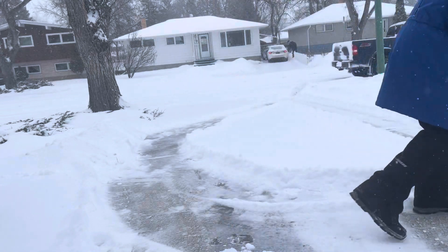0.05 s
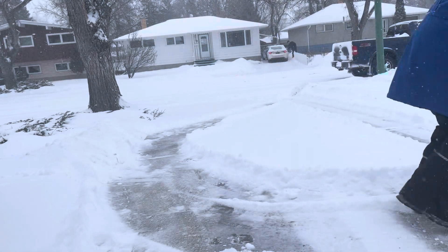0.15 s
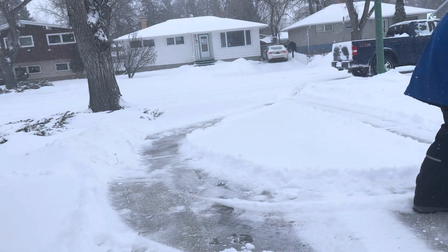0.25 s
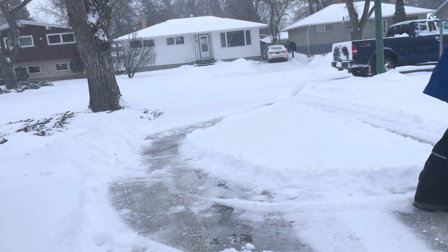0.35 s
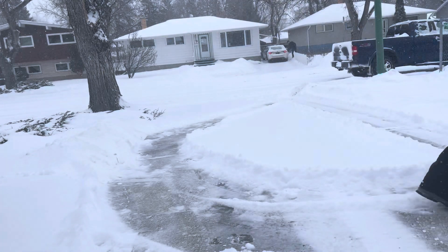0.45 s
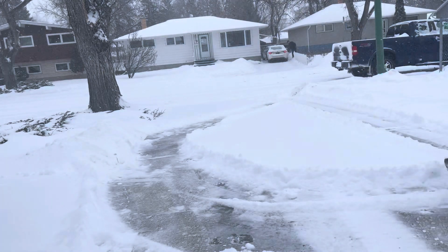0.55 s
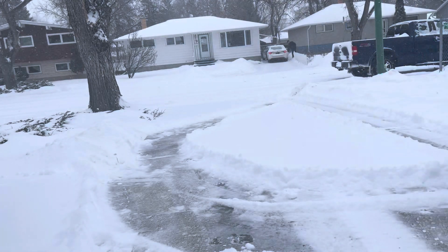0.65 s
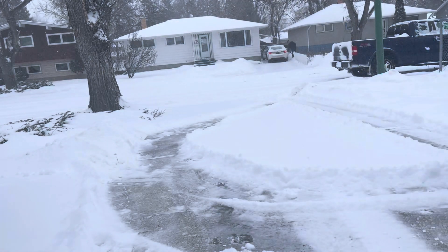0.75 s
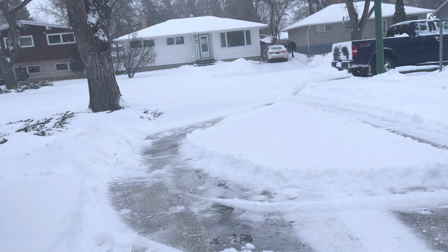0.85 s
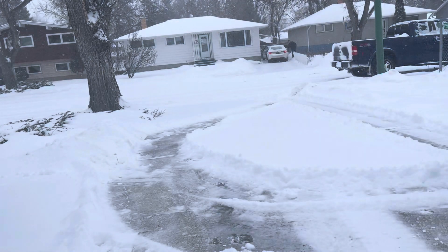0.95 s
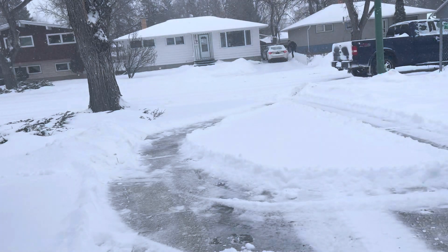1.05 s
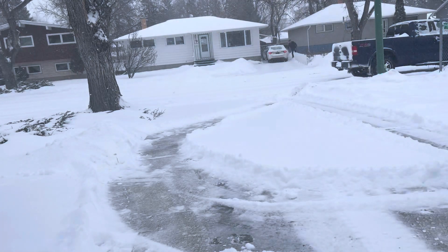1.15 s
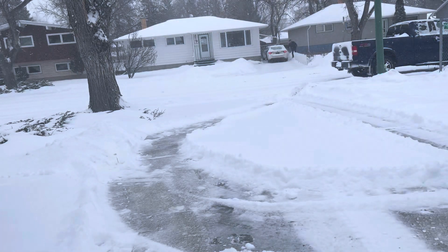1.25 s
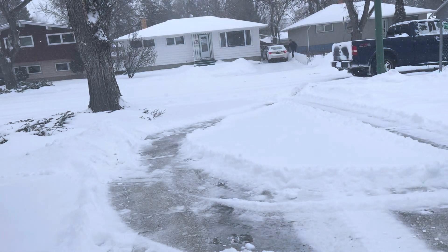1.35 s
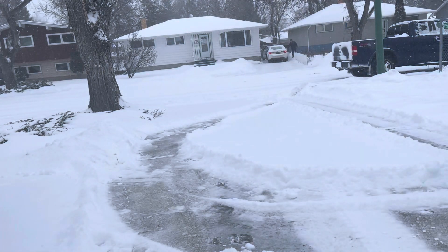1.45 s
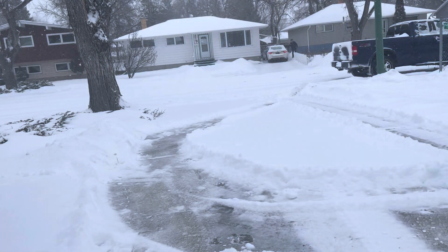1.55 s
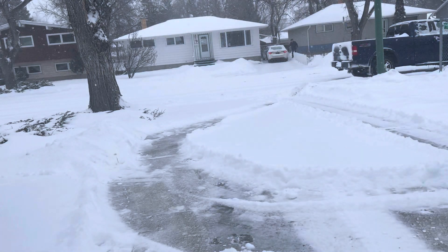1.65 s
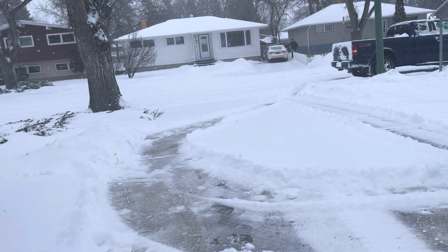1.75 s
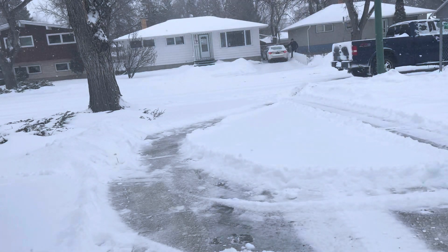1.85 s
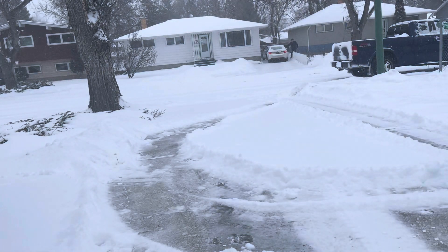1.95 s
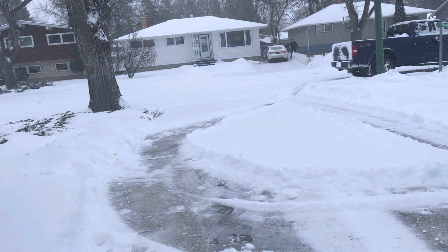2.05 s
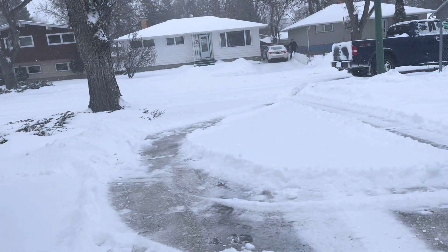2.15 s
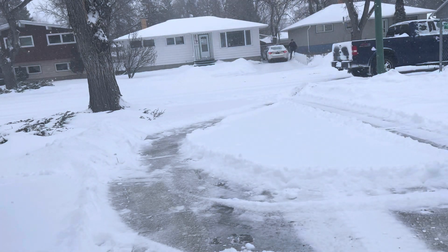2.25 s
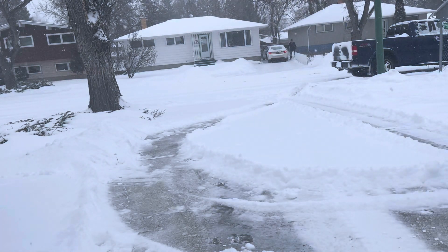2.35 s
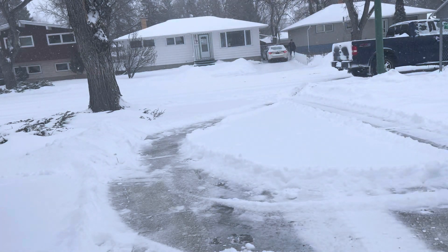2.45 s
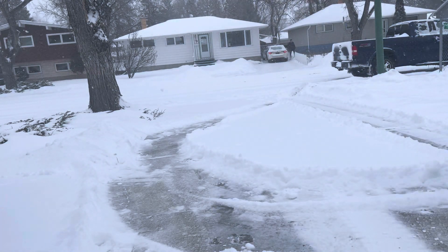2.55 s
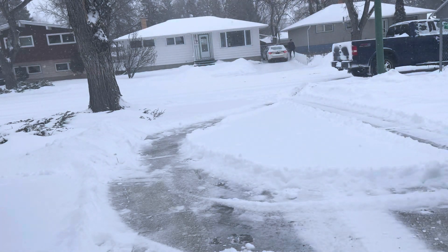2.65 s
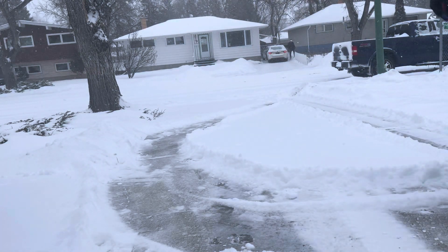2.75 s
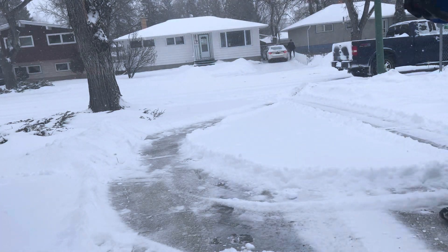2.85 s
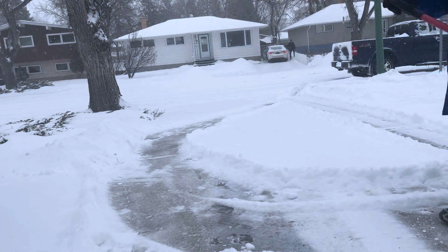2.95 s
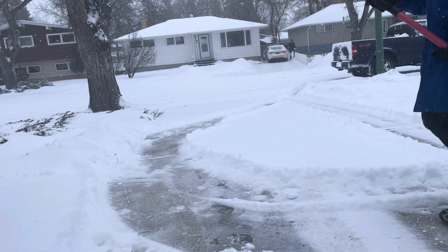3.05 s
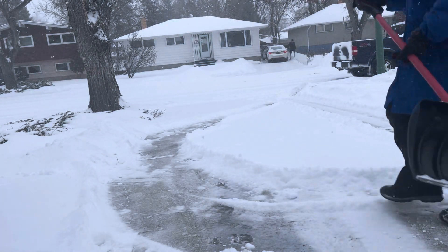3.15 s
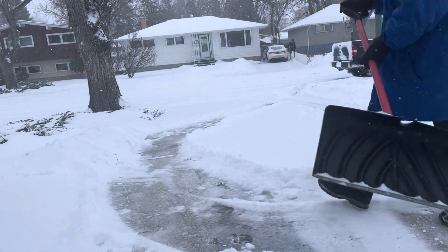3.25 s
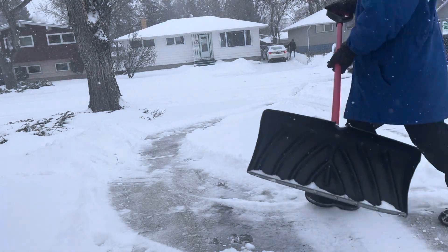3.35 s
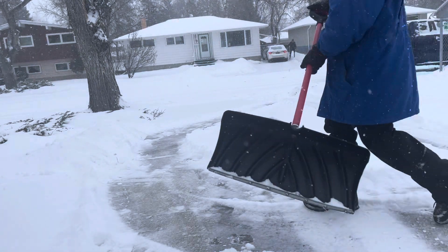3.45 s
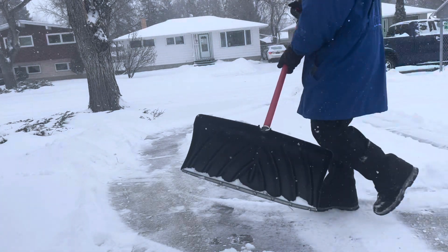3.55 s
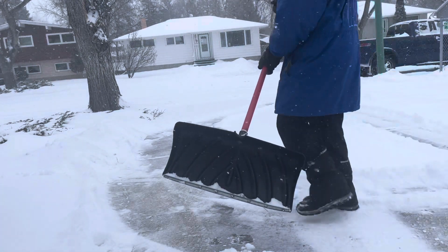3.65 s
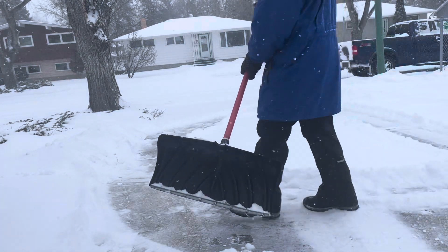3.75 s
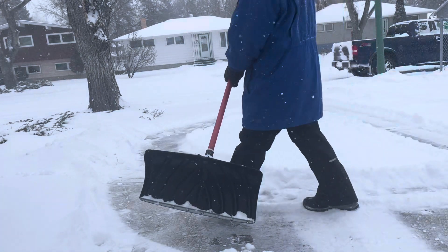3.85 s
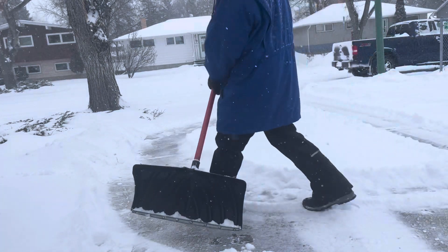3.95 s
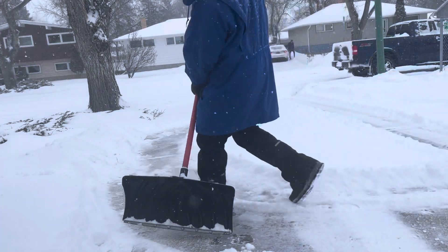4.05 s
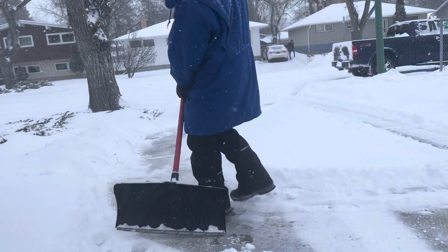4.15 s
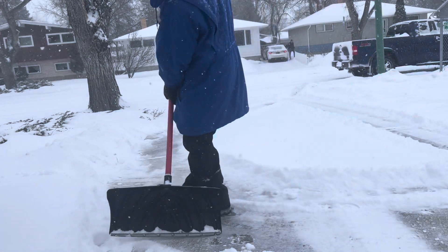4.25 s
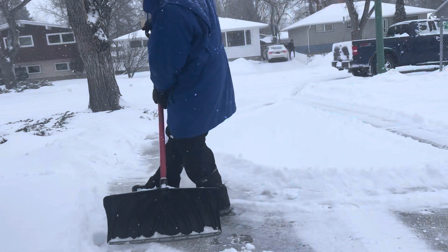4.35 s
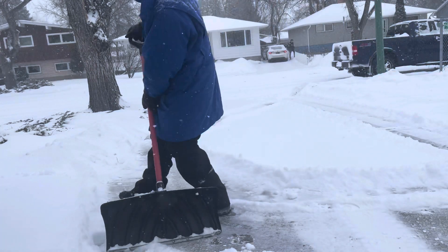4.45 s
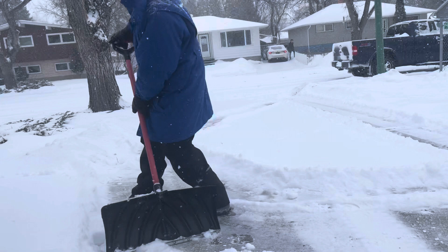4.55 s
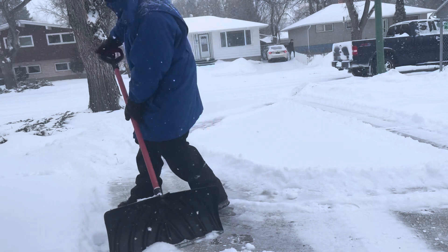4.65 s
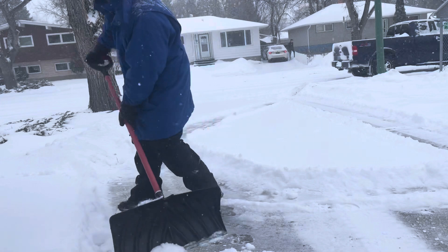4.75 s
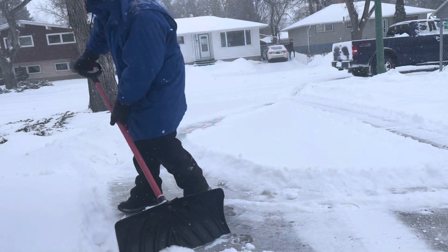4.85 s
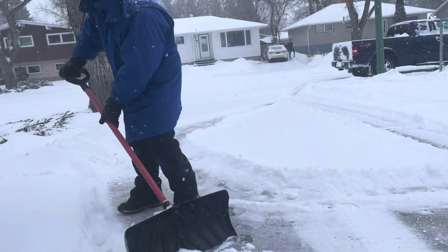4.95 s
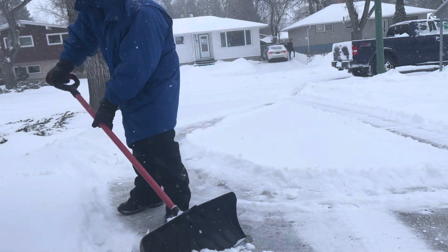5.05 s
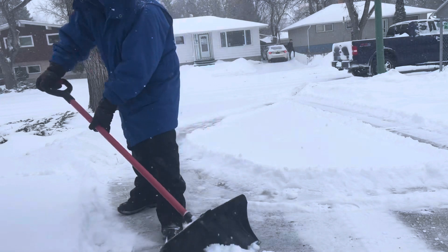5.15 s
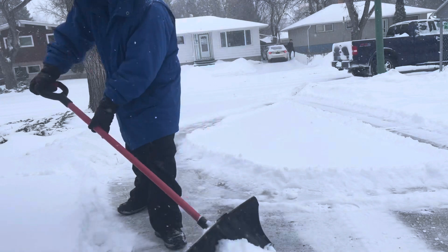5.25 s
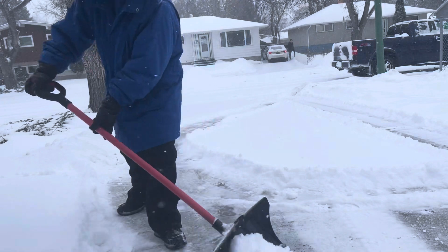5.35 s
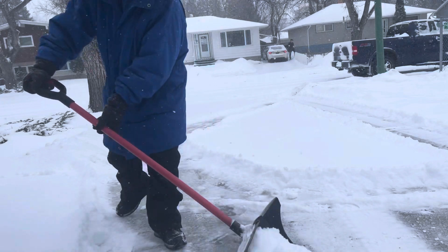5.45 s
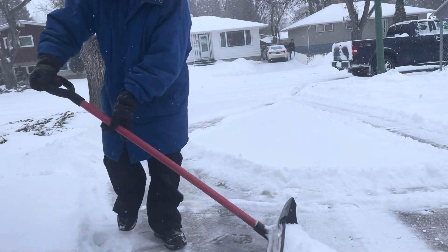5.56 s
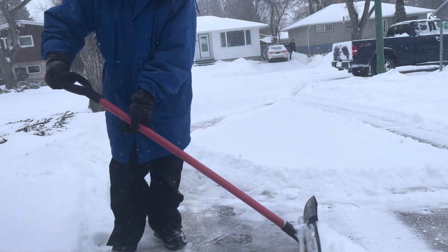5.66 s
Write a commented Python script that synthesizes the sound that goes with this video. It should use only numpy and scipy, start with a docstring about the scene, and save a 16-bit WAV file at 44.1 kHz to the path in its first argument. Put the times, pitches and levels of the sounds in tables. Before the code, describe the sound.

An engine idles in the street throughout, with a quiet low rumble and fast, steady ticking over a soft rush of distant traffic. For the first half second, a plastic snow shovel glides over snowy pavement a little way off, catching with a few small bumps. From about 0.6 to 4.1 seconds, boots crunch and creak faintly in snow and nylon clothes swish; the swishes are clearest around 2.5 to 2.9 seconds, the creaks around 3.8 to 4. At about 4.4 seconds the blade is set down close to the microphone, bouncing with several hollow knocks. From 4.7 seconds comes a loud, close push: the empty blade booms and judders, then the boom eases as snow fills it, while the edge grinds over grit with sharp snaps, brief ringing skids and a snowy hiss. The scrape dips around 5.4 seconds and swells again until the end, near 5.7.

```python
"""A wide plastic snow shovel ends one push over snowy pavement, is carried back, set down close by and
pushed again. Its edge grinds, sticks and catches on grit, and the hollow blade booms until snow fills it.
Between the pushes, boots press the snow and nylon clothes swish. All along, an engine idles in the
street with a low rumble and a steady tick, over the soft rush of distant traffic."""
import sys
import numpy as np
from scipy.fft import rfft, irfft, next_fast_len
from scipy.io import wavfile
from scipy.ndimage import map_coordinates

SR = 44100
rng = np.random.default_rng(int(sys.argv[2]) if len(sys.argv) > 2 else 0)


def pcm_store(signal):
    """Save signal as 16-bit PCM."""
    levels = np.round(np.clip(np.atleast_2d(signal), -1, 1) * 32767)
    wavfile.write(sys.argv[1], SR, levels.astype(np.int16).T)


N = 252252
TIME = np.arange(N) / SR
DIRECT_ONLY = np.array([[1], [0]])  # sounds have two rows: direct and scattered

# the edge catches hard on the ground: t/s, crushed grit/dB, thump/dB, thump pitch/Hz
CATCHES = [(0.319, -40.5, -24, 660), (0.322, -38, -27, 223), (0.329, -29.5, -21.5, 612),
           (0.331, -40, -14.5, 147), (0.346, -35, -38, 615), (0.358, -36, -29, 608),
           (0.406, -43.5, -31.5, 560), (0.446, -47, -27.5, 615), (0.484, -43, -27, 572),
           (0.493, -38, -26.5, 170), (4.651, -26, -17, 353), (4.662, -25, -14, 395),
           (4.677, -17, -11.5, 272), (4.690, -17, -13, 295), (4.703, -31, -5.5, 415),
           (4.714, -20, -12, 220), (4.759, -24.5, -15, 260), (4.773, -21, -6.5, 248),
           (4.789, -16.5, -11, 258), (4.817, -19.5, -7.5, 270), (4.831, -15.5, -7.5, 428),
           (4.839, -41, -13, 233), (4.864, -21, -7.5, 298), (4.883, -20.5, -10.5, 387),
           (4.906, -37, -10.5, 231), (4.923, -21.5, -9, 292), (4.939, -30, -10.5, 267),
           (4.961, -21.5, -21, 310), (5.027, -19.5, -16, 292), (5.049, -26, -11.5, 520),
           (5.065, -17.5, -12.5, 262), (5.109, -19, -16, 280), (5.142, -23.5, -28, 540),
           (5.165, -18.5, -11.5, 283), (5.249, -21, -12.5, 323), (5.273, -23, -23, 317),
           (5.347, -23.5, -14, 326), (5.402, -27, -36, 275), (5.413, -28.5, -24, 300),
           (5.537, -39, -16.5, 322), (5.605, -29, -14, 345), (5.619, -27, -15.5, 368),
           (5.669, -23, -16, 329.8), (5.675, -26.5, -7.5, 306), (5.703, -29, -14, 370)]
# low and high resonances (pitches it rings at) of the pressed blade: f/Hz, width/Hz, level/dB
BOOM_MODES = [(138, 133, -10.5), (284.4, 47, -0.5), (338, 67, -5), (460, 66, -6), (564, 27, -11)]
GRIND_MODES = [(557, 53, 9), (757, 48, 10.5), (933, 165, 3.5), (1352, 165, 5), (1570, 200, 1.5),
               (2046, 30, -6), (2098, 60, -1.5), (2360, 270, -4), (2740, 58, -1), (2925, 120, -4.5),
               (3040, 420, -14), (3110, 59, 2.5), (3197, 63, -2), (3490, 230, -10), (4130, 410, -8),
               (4400, 320, -24)]
# tone colours of sliding snow, crushed snow and scraped stone: f/Hz, level/dB
SNOW_HISS = [(1500, -44), (3500, -16.5), (5000, -11), (6700, -9.5), (7800, -3.5), (9300, 1), (10200, 1),
             (11800, -12.5), (12800, -26), (13800, -48), (16000, -50)]
SNOW_CRUNCH = [(100, -25), (250, 18), (450, 3), (800, 14), (1400, 11), (2400, 13.5), (4000, 1), (7000, -7),
               (9000, 12), (13000, -50)]
STONE_RASP = [(250, -75), (500, 6.5), (900, -4.5), (1400, -1), (2400, -1.5), (3200, -3), (4500, -11),
              (6000, -12.5), (9000, -26), (13000, -70)]


def amp(db):
    """Turn decibels into a gain."""
    return 10 ** (np.asarray(db) / 20)


def rms(x):
    """The average strength of a signal (root mean square)."""
    return np.sqrt(np.mean(x ** 2) + 1e-20)


def unit(x):
    """Scale a signal to an average strength of 1."""
    return x / rms(x)


def along(points, hz):
    """Read between (frequency, value) points on a logarithmic frequency axis."""
    f, values = np.transpose(points)
    return np.interp(np.log(hz + 1), np.log(f + 1), values)


def curves(rows):
    """Turn each column after the time into one value per sample."""
    times, *columns = np.transpose(rows)
    return [np.interp(TIME, times, column) for column in columns]


def wobble(rate, size=N):
    """A smooth curve through `rate` random values a second."""
    count = int(size * rate / SR) + 4
    fine = np.arange(0, count, 1 / 8)
    smooth = map_coordinates(rng.standard_normal(count), [fine])
    return np.interp(np.arange(size) * rate / SR, fine, smooth)


def filtered(x, response):
    """Multiply each frequency f in x by response(f)."""
    size = x.shape[-1]
    padded = next_fast_len(size + 4096)
    return irfft(rfft(x, padded) * response(np.fft.rfftfreq(padded, 1 / SR)), padded)[..., :size]


def lowpass(x, hz, steepness):
    """Turn down everything above hz."""
    return filtered(x, lambda f: 1 / (1 + (f / hz) ** steepness))


def bandpass(x, low_hz, high_hz):
    """Turn down everything below low_hz and above high_hz."""
    return filtered(x, lambda f: (1 - 1 / (1 + (f / low_hz) ** 4)) / (1 + (f / high_hz) ** 4))


def coloured(x, spectrum):
    """Give x a tone colour, at strength 1."""
    return unit(filtered(x, lambda f: amp(along(spectrum, f))))


def rung(x, modes):
    """Let x ring a set of resonances (f/Hz, width/Hz, level/dB), at strength 1."""
    def response(f):
        return sum((-1) ** k * amp(db) * 1j * f * width / (hz * hz - f * f + 1j * f * width)
                   for k, (hz, width, db) in enumerate(modes))
    return unit(filtered(x, response))


def grit(rate, spread_db, size=N):
    """Two rows of tiny cracks of uneven strength, about `rate` a second in each."""
    hit = rng.random((2, size)) < rate / SR
    sign, chance = rng.random((2, 2, size))
    strength = amp(spread_db * np.minimum(-np.log(1 - chance[hit]), 3))
    out = np.zeros((2, size))
    out[hit] = strength * np.sign(sign[hit] - .5)
    return unit(out)


def add(track, s, sound):
    """Mix a sound into a track, starting at s seconds."""
    part = track[:, max(round(s * SR), 0):][:, :sound.shape[-1]]
    part += sound[..., :part.shape[-1]]


def arch(length_s):
    """Progress from 0 to 1 through a movement, and a swell that rises and falls with it."""
    progress = np.linspace(0, 1, int(length_s * SR))
    return progress, np.sin(np.pi * progress)


def effort(drive, boom_db, grind_db, hiss_db, empty_db, attack_s=.03, release_s=.11, fill_s=0.25):
    """Boom, grind and hiss levels in dB follow the drive; the boom changes as snow fills the blade."""
    drive_db, = curves(drive)
    mean_db = np.mean(drive, axis=0)[1]
    swing_db = drive_db - mean_db
    since_start, since_end = TIME - drive[0][0], TIME - drive[-1][0]
    fade_db = 60 * (np.minimum(since_start, 0) / attack_s - np.maximum(since_end, 0) / release_s)
    hollow_db = empty_db * np.exp(-np.maximum(since_start, 0) / fill_s)
    levels = [boom_db + 0.43 * swing_db + hollow_db, grind_db + swing_db, hiss_db + 1.42 * swing_db]
    return mean_db + fade_db + np.array(levels)


def bent(x, s):
    """Bending and a load of snow shift the blade's pitch: play x faster or slower, 4/5 as long."""
    bend = [(4.649, 1.01), (4.751, 0.89), (5.05, 0.97), (5.3, 1.02), (5.7, 0.99)]  # the blade's pitch: t/s, ratio to the unbent pitch
    size = len(x) * 4 // 5
    speed = np.interp(s + np.arange(size) / SR, *np.transpose(bend))
    return np.interp(np.cumsum(speed), np.arange(len(x)), x)


def grinding(force, s, modes, rate, spread_db, ring_db=3, lower_at_s=5.3, lowering_s=0.086):
    """Some grit cracks in the open and some rings the blade, at new pitches once the handle is lowered."""
    flat_modes = [(600, 46, -5), (788, 48, 2), (1009, 76, 4.5), (1244.4, 100, 3), (1420, 170, 0),
                  (1620, 120, 2), (2040, 200, -4), (2690, 61, 1.5), (3170, 280, -9), (3700, 36, -5),
                  (4030, 94, -4.5), (4610, 150, -7.5)]  # resonances of the blade lying flat: f/Hz, width/Hz, level/dB
    bare, ringing = (force * grit(rate, spread_db, len(force)) for _ in range(2))
    t = s + np.arange(len(force)) / SR
    flatness = np.clip(.5 + (t - lower_at_s) / lowering_s, 0, 1)
    ring = np.sqrt(1 - flatness) * rung(ringing, modes) + np.sqrt(flatness) * rung(ringing, flat_modes)
    return unit(coloured(bare, STONE_RASP) + amp(ring_db) * ring)


def pings(size, rate=220, centre_hz=2150, spread=0.248, ring_s=0.0021, build_s=0.0012):
    """Many small stones spring free of the edge; each makes it ring briefly at a pitch of its own."""
    out, t = np.zeros((2, size)), np.arange(2048) / SR
    for when, pitch, strength, scattered in rng.random((int(rate * size / SR), 4)):
        hz = centre_hz * np.exp(spread * np.sqrt(12) * (pitch - .5))
        ring = np.sin(2 * np.pi * hz * t) * np.exp(-t / ring_s) * (1 - np.exp(-t / build_s))
        add(out, when * size / SR, amp(17.0 * strength) * ring * [[1], [2 * scattered - 1]])
    return unit(out)


def push(levels, boom_modes, grind_modes, chatter_db, slip_db, grain_rate, spread_db, ping_db):
    """The edge breaks grit in clumps as it sticks and slips; the blade rings and the snow hisses."""
    start, stop = np.flatnonzero(levels[1] > -100)[[0, -1]]  # while the grinding can be heard
    size, start_s = stop - start, start / SR
    # just before each catch the edge sticks, and grind and hiss dip
    lead_s, stick_s, dips_db = 0.016, 0.019, (0, 1.5, 4)
    sticks = [np.exp(-(2 * (TIME[start:stop] - s + lead_s) / stick_s) ** 2) for s, *_ in CATCHES]
    boom_db, grind_db, hiss_db = levels[:, start:stop] - np.outer(dips_db, np.max(sticks, axis=0))
    clumps_db = chatter_db * wobble(75.84, size) + slip_db * wobble(420, size)
    unbent = rung(grit(grain_rate, 3.5, size + size // 4 + 4), boom_modes)  # extra length for bending
    boom = np.array([bent(row, start_s)[:size] for row in unbent])
    boom = unit(bandpass(boom * amp(clumps_db / 3), 95, 800))
    stone_rate, crystal_rate = grain_rate * .45, grain_rate * 2  # stones are coarser than snow
    edge = grinding(amp(clumps_db), start_s, grind_modes, stone_rate, spread_db)
    edge = unit(edge + amp(ping_db) * pings(size))
    crystals = grit(crystal_rate, spread_db, size) * amp(0.47 * clumps_db + 0.28 * wobble(77.7, size))
    snow = coloured(crystals, SNOW_HISS)
    out = np.zeros((2, N))
    add(out, start_s, amp(boom_db) * boom + amp(grind_db) * edge + amp(hiss_db) * snow)
    return out


def exhaust(cycles, waver_db=1.0, throb_hz=2.06, throb_db=-6, dip_at_s=0.52):
    """The exhaust hums at multiples of the engine's beat; a slightly slower hum makes it throb."""
    harmonics = [(1, -65), (2, -44), (3, -52.5), (4, -52.5), (5, -61), (6, -64)]  # exhaust tones: multiple of the beat, level/dB
    tones = []
    for multiple, db in harmonics:
        gain = np.sqrt(2) * amp(db + waver_db * wobble(3.8))
        tones.append(gain * np.exp(2j * np.pi * (multiple * cycles + rng.random())))
    firing_note = tones[1]
    slower_hum = -amp(throb_db) * firing_note * np.exp(-2j * np.pi * throb_hz * (TIME - dip_at_s))
    return (sum(tones) + slower_hum).imag * DIRECT_ONLY


def ticking(cycles, beat_hz, rise_s=0.00049, fall_s=0.0029, uneven_db=1.8):
    """Metal in the engine rattles once each cycle, and its resonances are struck unevenly."""
    tick_levels = [(0.45, -45, -48, -60), (.75, -48, -36.5, -59), (1.2, -41, -36.5, -50),
                   (1.45, -42, -44.5, -42.5), (2.0, -41, -44, -47), (2.4, -45.5, -44.5, -53),
                   (3.7, -43.5, -42.5, -60), (4.4, -41.5, -39.5, -48)]  # parts of the tick: t/s, low clack/dB, high tick/dB, ring/dB
    hard_ticks = [(0.686, 2.5), (0.792, 4), (1.039, 5), (1.215, 5), (1.288, 0), (1.752, 3), (1.93, 1),
                  (1.965, 1), (4.115, 4), (4.402, 2)]  # ticks that stand out: t/s, extra level/dB
    # resonances of the three parts: f/Hz, width/Hz, level/dB
    low_modes = [(860, 790, -9), (1630, 315, 4), (2040, 286, 3.5), (3080, 550, -2.5)]
    high_modes = [(3330, 160, -4.5), (4340, 120, -5.5), (4960, 180, -5), (6060, 1140, -3.5), (6900, 220, 0),
                  (8300, 1900, -4.5), (10000, 640, 4)]
    ring_modes = [(4330, 500, 0)]
    since_tick = (cycles - np.round(cycles)) / beat_hz
    strike = np.exp(-np.abs(since_tick) / np.where(since_tick < 0, rise_s, fall_s))
    hard_db = sum(db * (np.abs(TIME - s) < .5 / beat_hz) for s, db in hard_ticks)
    ticks = np.zeros((2, N))
    for level_db, modes in zip(curves(tick_levels), [low_modes, high_modes, ring_modes]):
        gain = amp(level_db + hard_db + uneven_db * wobble(beat_hz))
        ticks += gain * rung(strike * grit(15000, 3.5), modes)
    return lowpass(rms(strike) * ticks, 10500, steepness=20)


def engine(beat_hz=28.011):
    """An idling engine: one slightly drifting beat drives both the exhaust and the ticking."""
    drift = [(0, .01), (.55, .0075), (1.22, .0016), (2.15, .0016), (2.95, .0068), (3.8, .0075),
             (4.4, .0098)]  # how far the engine falls behind an even beat: t/s, lag/s
    lag_s, = curves(drift)
    cycles = (TIME - lag_s) * beat_hz
    return exhaust(cycles) + ticking(cycles, beat_hz)


def street(rush_db=-46.0, drift_db=-0.5):
    """Distant traffic makes a soft rush and a wavering hum."""
    rush_colour = [(15, -31), (35, -8), (50, -1), (75, 2.5), (115, -1.5), (170, -6), (340, -19), (470, -14),
                   (580, -17.5), (780, -15.5), (1300, -25.5), (1800, -22), (3500, -28), (7000, -32),
                   (9700, -22), (11000, -31), (13000, -102)]  # tone colour of the rush: f/Hz, level/dB
    hum_tones = [(87.6, -46), (120, -54)]  # tones of the hum: f/Hz, level/dB
    hum_swell = [(.3, -5.5), (.65, 1.5), (1.6, 1), (2.2, 2.5), (2.8, -1.5), (3.7, 1), (4.3, -4.5),
                 (4.75, 6), (5.2, -10)]  # the hum swells and sinks: t/s, extra level/dB
    swell_db, = curves(hum_swell)
    hum = np.zeros(N)
    for hz, db in hum_tones:
        gain = np.sqrt(2) * amp(db + swell_db + 1.2 * wobble(11.0))
        hum += gain * np.sin(2 * np.pi * hz * TIME + 1.22 * wobble(4.05))
    rush = amp(rush_db + drift_db * wobble(4.83)) * coloured(rng.standard_normal((2, N)), rush_colour)
    return rush + hum * DIRECT_ONLY


def jolt(hz, flex_s=0.0047, rattle=0.39, break_s=0.0028):
    """One jolt of the blade: a burst of force, a thump as it flexes a few times, and a puff of snow."""
    t = np.arange(4096) / SR
    burst = np.sqrt(t / break_s) * np.exp((1 - t / break_s) / 2)
    flex = (t / flex_s) ** 2 * np.exp(2 - 2 * t / flex_s) * np.sin(2 * np.pi * hz * t)
    body = lowpass(rung(burst * grit(4000, 7.1, len(t)), BOOM_MODES), 1000, steepness=4)
    thump = flex * DIRECT_ONLY + rattle * body / np.abs(body).max()
    snow = coloured(burst * grit(2700, 5.6, len(t)), SNOW_HISS)
    return burst, thump, snow


def catches(levels, thump_gain_db=-5, grind_db=-1, hiss_db=1):
    """Each catch thumps the blade and crushes grit, with as much snow as the push has just then."""
    out = np.zeros((2, N))
    hiss_over_grind_db = levels[2] - levels[1]
    for s, crush_db, thump_db, hz in CATCHES:
        burst, thump, snow = jolt(hz)
        edge = grinding(burst, s, GRIND_MODES, rate=3500, spread_db=5.0)
        snow_db = hiss_db + np.interp(s, TIME, hiss_over_grind_db)
        crush = rms(burst) * (amp(grind_db) * edge + amp(snow_db) * snow)
        add(out, s, amp(thump_db + thump_gain_db) * thump + amp(crush_db) * crush)
    return out


def snaps(crack_s=0.0025, ring_db=-1, width_hz=130, snow_db=-2):
    """A stone snaps free: a sharp crack of stone and snow crystals, and a short ring of the edge."""
    freed_stones = [(0.349, -19.5, 2000), (4.631, -15.5, 1130), (4.691, -24, 1590), (4.76, -24, 1400),
                    (4.8064, -11, 3380), (4.8154, -12, 1540), (4.8404, -18.5, 950), (5.0768, -11, 1560),
                    (5.0977, -34, 902), (5.1264, -28, 2070), (5.1444, -8.5, 1320), (5.178, -16, 1910),
                    (5.2288, -9.5, 988), (5.2515, -21, 1269), (5.2737, -7, 2980), (5.3485, -14.5, 1130),
                    (5.4026, -11, 1140), (5.4172, -14.5, 1520), (5.5353, -22, 970), (5.6061, -4.5, 1323),
                    (5.6491, -10.5, 1550), (5.6551, -10.5, 973), (5.6764, -11.5, 1700),
                    (5.7077, -8.5, 1060)]  # each snap: t/s, peak level/dB, ring pitch/Hz
    out, t = np.zeros((2, N)), np.arange(2048) / SR
    for s, db, hz in freed_stones:
        stone, snow, kick = (grit(14000, 2.5, len(t)) * np.exp(-t / crack_s) for _ in range(3))
        ring = rung(kick, [(hz, width_hz, 0), (hz * 2.3, 2 * width_hz, -5)])
        crack = coloured(stone, STONE_RASP) + amp(snow_db) * coloured(snow, SNOW_HISS)
        snap = crack + amp(ring_db) * ring
        add(out, s, amp(db) * snap / np.abs(snap).max())
    return out


def boots(creak_s=0.0018):
    """Snow crunches under each step, and packed snow now and then slips with a short creak."""
    # a sole presses the snow: t/s, length/s, level/dB, packed snow's pitch/Hz, packed over loose/dB
    steps = [(0.902, 0.043, -44.5, 704, 7), (0.928, 0.12, -48.5, 730, 1), (1.048, .03, -44.5, 580, 0),
             (1.06, 0.13, -50.5, 1310, -8), (2.158, 0.23, -51.5, 635, 2), (3.364, .025, -44, 720, 1),
             (3.391, 0.1, -39, 392, 6), (3.68, 0.046, -40, 302, 6), (3.8, 0.3, -47.5, 332, 4.5),
             (3.871, .022, -40, 380, 7), (3.986, 0.088, -41.5, 1590, 0)]
    creaks = [(0.642, -34, 870), (0.799, -32.5, 690), (3.769, -31, 1070), (3.807, -33.5, 790),
              (3.845, -27, 910), (3.876, -29, 784), (3.899, -28.5, 1110), (3.915, -31.5, 1160),
              (3.96, -28.5, 1140), (4.02, -28, 1140)]  # packed snow slips: t/s, peak level/dB, main pitch/Hz
    out, t = np.zeros((2, N)), np.arange(2048) / SR
    for s, length, db, hz, packed_db in steps:
        _, swell = arch(length)
        loose = coloured(grit(2000, 8.0, len(swell)), SNOW_CRUNCH)
        packed = rung(grit(2000, 8.0, len(swell)), [(hz, hz * 0.36, 0)])
        add(out, s, amp(db) * swell * unit(loose + amp(packed_db) * packed))
    for s, db, hz in creaks:
        slip = grit(5000, 1.8, len(t)) * t * np.exp(-t / creak_s)
        creak = rung(slip, [(hz * 0.27, 250, -5), (hz, 430, 0), (hz * 1.52, 550, -4)])
        add(out, s, amp(db) * creak / np.abs(creak).max())
    return lowpass(out, 10500, steepness=20)


def clothes(overtone=0.43, jerk=.05):
    """Nylon threads flick past each other: a hiss, and a rough zip that follows the leg's jerky speed."""
    # cloth rubs: t/s, length/s, hiss/dB, zip/dB, first pitch/Hz, last pitch/Hz, pitch scatter (0-1)
    swishes = [(0.936, 0.043, -53, -43, 2000, 2280, 0.14), (0.952, 0.079, -61, -45.5, 2600, 3190, 0.15),
               (0.972, 0.075, -56, -47, 1300, 1660, 0.16), (1.075, 0.069, -49, -42.5, 1980, 2290, 0.2),
               (1.154, 0.052, -53, -49, 2250, 2170, 0.23), (1.458, 0.28, -49.5, -60, 1503, 1680, 0.34),
               (2.54, 0.04, -37.5, -46.5, 1300, 1673, 0.17), (2.572, 0.032, -39, -38.5, 1890, 2220, 0.1),
               (2.74, 0.11, -38, -40.5, 1840, 1940, 0.27), (2.843, 0.078, -45, -47, 2000, 2070, 0.34),
               (3.115, 0.042, -42.5, -48, 2950, 3600, 0.16), (3.277, 0.15, -51, -53, 1870, 2010, 0.22),
               (3.659, 0.057, -44, -39.5, 2050, 2760, 0.13), (3.696, 0.023, -46, -40.5, 2750, 3100, 0.12)]
    out = np.zeros((2, N))
    for s, length, hiss_db, zip_db, first_hz, last_hz, scatter in swishes:
        progress, swell = arch(length)
        size = len(swell)
        flick_hz = (first_hz + (last_hz - first_hz) * progress) * (1 + jerk * wobble(109, size))
        phase = 2 * np.pi * np.cumsum(flick_hz * (1 + scatter * wobble(3000, size))) / SR
        tone = np.sin(phase) + overtone * np.sin(2 * phase)
        rough_tone = unit(tone * amp(3.3 * wobble(717, size)))
        zipping = rough_tone * np.sqrt(swell) * (flick_hz / last_hz) ** 2  # faster is louder
        hiss = swell * coloured(grit(12000, 3.9, size), SNOW_HISS)  # same tone colour as the snow
        add(out, s, amp(zip_db) * zipping * DIRECT_ONLY + amp(hiss_db) * hiss)
    return out


def knocks(thump_gain_db=-5, clack_gain_db=-9, hiss_db=-22, dull_hz=2300, ring_s=0.011, build_s=0.0019):
    """The blade is set down on snow and bounces: each hit thumps, clacks and rings the hollow plastic."""
    landings = [(4.416, -16, 261, -17.5, -31, 477), (4.476, -12, 408, -13, -21.5, 596),
                (4.482, -9.5, 392, -13.5, -17.5, 803), (4.494, -8, 258, -40, -16, 190),
                (4.536, -19, 300, -7.5, -29, 862), (4.5395, -2, 325, -8, -15, 515),
                (4.568, -13.5, 296, -26, -15.5, 187), (4.61, -20, 300, -24, -30, 480),
                (4.621, -21.5, 360, -22, -25, 170)]  # each hit: t/s, thump/dB, thump pitch/Hz, clack/dB, ring/dB, ring pitch/Hz
    clack_modes = [(513, 70, -5), (770, 67, 2.5), (910, 360, -4), (1410, 260, -15.5), (1580, 110, -8),
                   (2920, 12000, -13)]  # resonances of the knocked blade: f/Hz, width/Hz, level/dB
    out = np.zeros((2, N))
    for s, thump_db, thump_hz, clack_db, ring_db, ring_hz in landings:
        burst, thump, snow = jolt(thump_hz)
        t = np.arange(len(burst)) / SR
        ring = np.sin(2 * np.pi * ring_hz * t) * np.exp(-t / ring_s) * (1 - np.exp(-t / build_s))
        clack = lowpass(rung(burst * grit(4200, 5.7, len(t)), clack_modes), dull_hz, steepness=2)
        snowy_clack = rms(burst) * (clack + amp(hiss_db) * snow)
        add(out, s, amp(thump_db + thump_gain_db) * thump + amp(clack_db + clack_gain_db) * snowy_clack)
        add(out, s, amp(ring_db) * ring * DIRECT_ONLY)
    return out


def rocking(from_s=4.42, until_s=4.66, level_db=-36, crunch_db=-17, fade_s=0.013):
    """The hollow blade rumbles softly while it rocks and settles on a little snow."""
    fade = np.clip(np.minimum(TIME - from_s, until_s - TIME) / fade_s, 0, 1)
    rumble = unit(bandpass(rung(grit(3000, 1.5), BOOM_MODES), 190, 400))
    crunch = coloured(grit(690, 5.2), SNOW_CRUNCH)
    return amp(level_db) * fade * (rumble + amp(crunch_db) * crunch)


def skids():
    """A stone dragged under the edge makes it ring, at a pitch that slides as the stone moves along."""
    # each skid: t/s, length/s, level/dB, first pitch/Hz, last pitch/Hz, resonance width/Hz
    dragged_stones = [(4.678, 0.049, -27, 1690, 1580, 160), (4.955, 0.021, -28, 3100, 3050, 300),
                      (4.985, 0.079, -36, 3030, 2860, 90), (4.994, .025, -24.5, 1350, 1340, 300),
                      (5.025, 0.028, -32, 3080, 2970, 350), (5.062, 0.024, -23.5, 2960, 2970, 350),
                      (5.102, .025, -27, 2050, 2070, 140), (5.139, .017, -22, 3070, 2780, 500),
                      (5.15, .06, -27.5, 2050, 2085, 70), (5.165, 0.099, -36, 2950, 2710, 250),
                      (5.27, 0.016, -24.5, 3220, 3100, 800), (5.398, 0.024, -29.5, 3150, 3150, 350.1),
                      (5.527, .018, -32.5, 3330, 3180, 450)]
    out = np.zeros((2, N))
    for s, length, db, first_hz, last_hz, width_hz in dragged_stones:
        progress, swell = arch(length)
        phase = 2 * np.pi * np.cumsum(first_hz + (last_hz - first_hz) * progress) / SR
        waves = np.array([[np.cos(phase)], [np.sin(phase)]])
        # keep only the part of the scrape that lies near the sliding pitch
        strengths = lowpass(grit(8000, 3.2, len(swell)) * waves, width_hz / 2, steepness=2)
        ring = unit(np.sum(strengths * waves, axis=0))
        add(out, s, amp(db) * np.sqrt(swell) * ring)
    return out


def placed(sound, place):
    """Direct and scattered sound reach the left and right microphones with their own delay and level."""
    # in the treble the shape of the microphone openings decides:
    # f/Hz, left's lead/rad, left over right/dB, left-right likeness (0-1)
    openings = [(6400, 0, 1.5, 0.92), (7140, 1.4, 7.5, 0.65), (7600, 1, 2.5, 0.64), (8530, 0, 1, 0.98),
                (10110, -3, -0.5, 1), (11360, -4.5, 0.5, 0.61), (12200, -5, 0, 0.59)]
    table = np.array(place + openings)
    lead, balance, likeness = (np.column_stack([table[:, 0], column]) for column in table.T[1:])
    sides = np.array([[1], [-1]]) / 2

    def blend(f):
        angle = np.arccos(np.clip(along(likeness, f), 0, 1)) / 2
        return np.array([np.cos(angle), np.sin(angle)])

    direct, scattered = filtered(sound, blend)
    stereo = np.array([direct + scattered, direct - scattered])
    return filtered(stereo, lambda f: amp(sides * along(balance, f)) * np.exp(1j * sides * along(lead, f)))


def scene():
    """The first push, the walk back and the street are further off; the second push is close by."""
    # how hard each push drives the edge over the pavement: t/s, drive/dB
    far_drive = [(0.015, -40.5), (0.2, -40), (0.3, -42.5), (0.38, -42), (0.5, -43)]
    near_drive = [(4.68, -36), (4.72, -34), (4.748, -41.5), (4.78, -32.5), (4.87, -32), (5.018, -26.5),
                  (5.18, -26.5), (5.285, -28), (5.33, -33), (5.41, -32.5), (5.455, -38), (5.56, -31),
                  (5.72, -27.5)]
    # low and high resonances of the gliding blade: f/Hz, width/Hz, level/dB
    glide_boom = [(127, 40, 0), (177, 46, 3.5), (263, 39, -2.5)]
    glide_grind = [(566, 42, 0.5), (627, 53, 7.5), (784, 380, -2), (1280, 180, -16), (1926, 120, 4),
                   (2610, 150, -0.5), (3240, 260, -1.5), (4070, 170, -3.5), (4460, 300, -5),
                   (5340, 150, -26)]
    # how sound arrives from each place: f/Hz, left's lead/rad, left over right/dB, likeness (0-1)
    near_place = [(100, -0.17, 1, 0.96), (350, 0.034, .5, 0.98), (550, 0.32, -1, 0.92),
                  (720, 0.77, -.5, 0.96), (1000, 1.06, -1.5, 0.96), (1300, 0.57, 3, 0.89),
                  (1880, 0.88, 2.5, 0.87), (2560, 1.67, 6, 0.85), (3760, 1.32, 6, 1), (4670, 0.16, 7, 0.53),
                  (5450, 0.75, 9.5, 0.65)]
    far_place = [(100, -0.32, 1.5, 1), (296, -0.21, .5, 0.93), (493, -0.83, -3, 0.64), (890, 1.2, 1, 0.044),
                 (1320, -0.18, -3, 0.55), (1990, -0.68, 2.5, 0.67), (2930, 1.9, 7, 0.74),
                 (4100, 0.72, 3, 0.76), (5350, 0.88, 7, 0.71)]
    far = effort(far_drive, boom_db=-3.0, grind_db=0, hiss_db=4.5, empty_db=-2.5)
    near = effort(near_drive, boom_db=0.5, grind_db=2, hiss_db=-2.5, empty_db=13.5)
    shovel = push(far, glide_boom, glide_grind, chatter_db=2.0, slip_db=1.0,
                  grain_rate=8200, spread_db=5.0, ping_db=-27)
    shovel += push(near, BOOM_MODES, GRIND_MODES, chatter_db=0.87, slip_db=3.0,
                   grain_rate=5200, spread_db=3.5, ping_db=-12)
    shovel += catches(np.maximum(far, near)) + skids() + snaps() + knocks() + rocking()
    is_close = TIME > (far_drive[-1][0] + near_drive[0][0]) / 2  # from halfway between the pushes
    further_off = shovel * ~is_close + boots() + clothes() + engine() + street()
    return placed(shovel * is_close, near_place) + placed(further_off, far_place)


def record(dry, top_hz=15800):
    """Soften the highest treble and cut everything above top_hz."""
    return filtered(dry, lambda f: (f < top_hz) * amp(along([(12000, -0.5), (13800, -13)], f)))


dry = scene()
out = record(dry)
pcm_store(out)
```